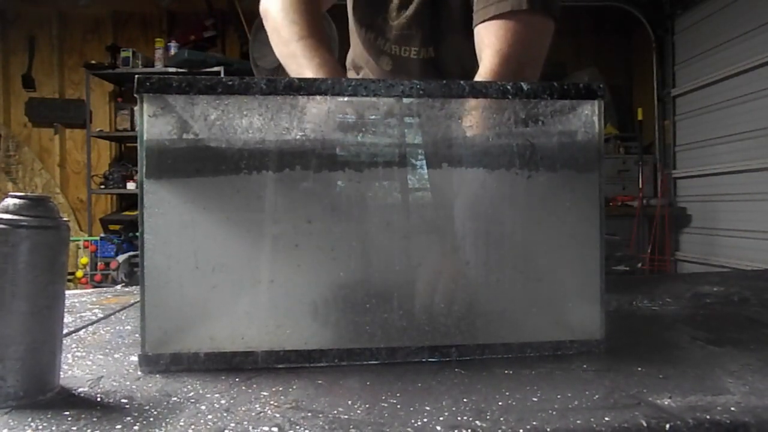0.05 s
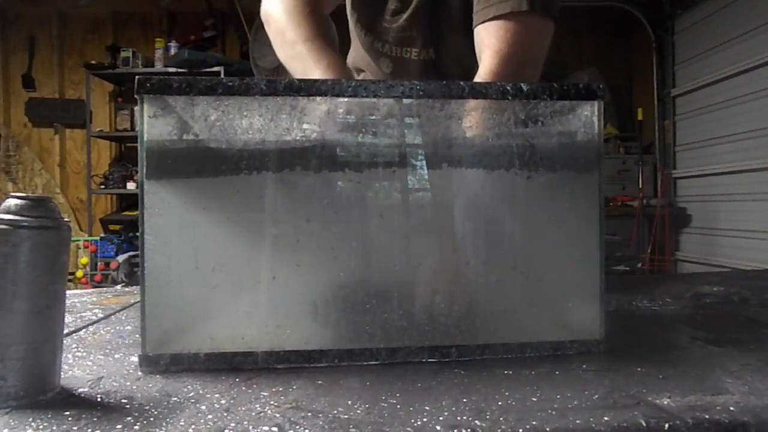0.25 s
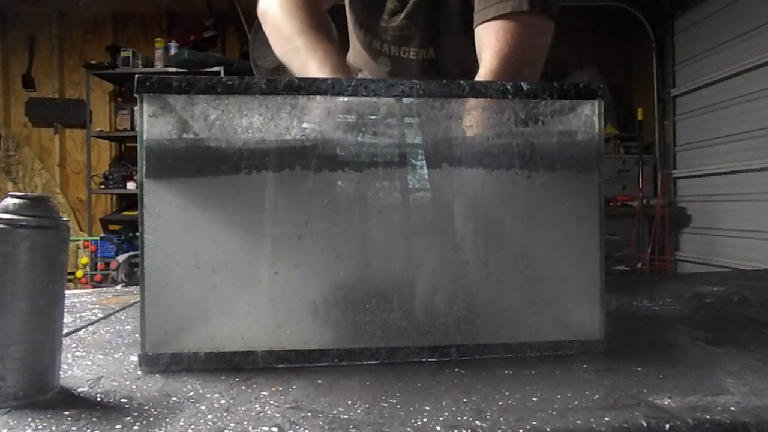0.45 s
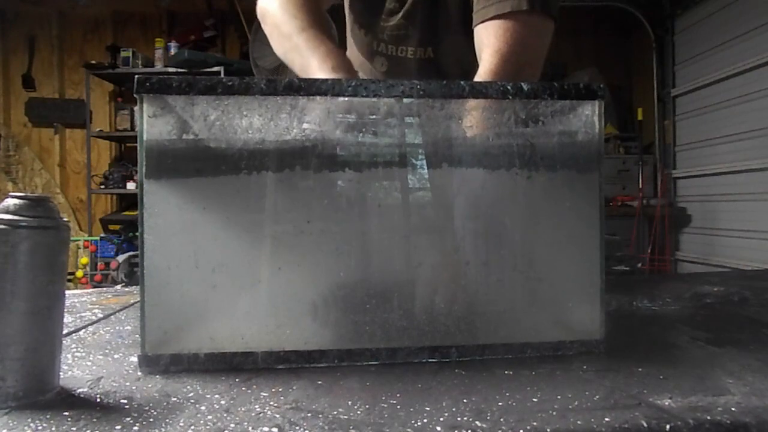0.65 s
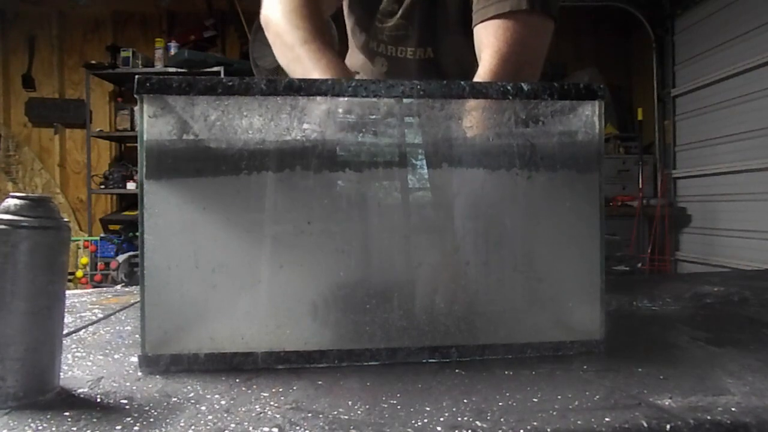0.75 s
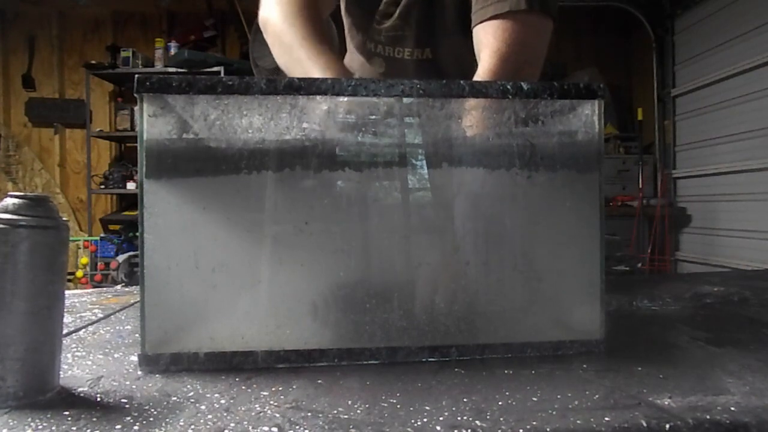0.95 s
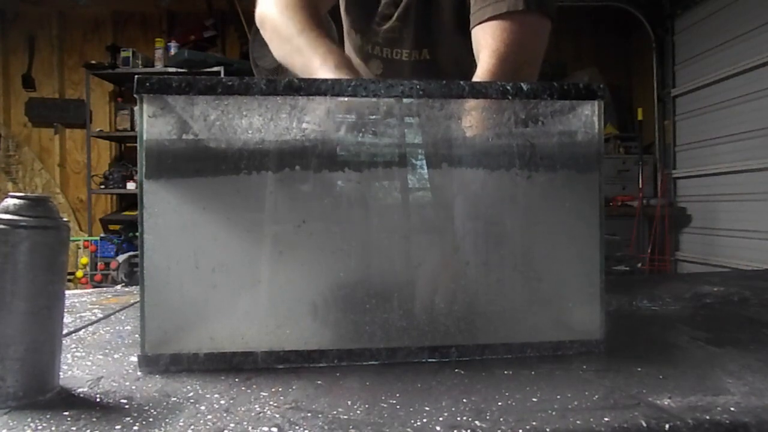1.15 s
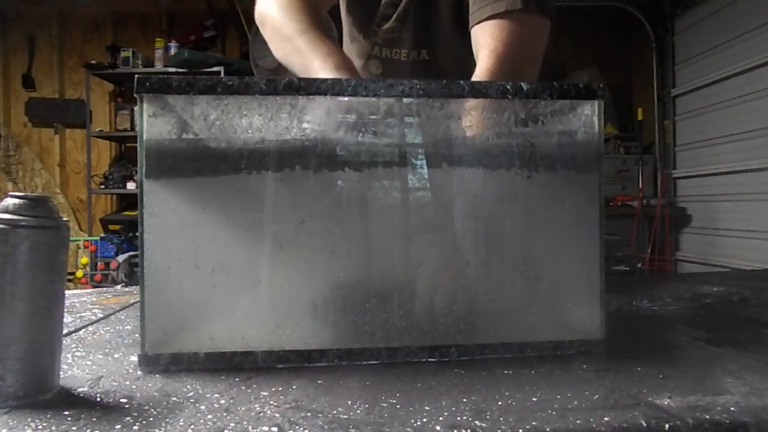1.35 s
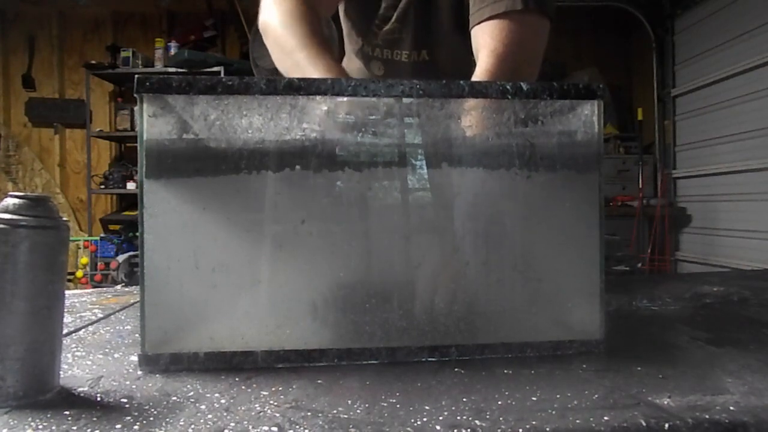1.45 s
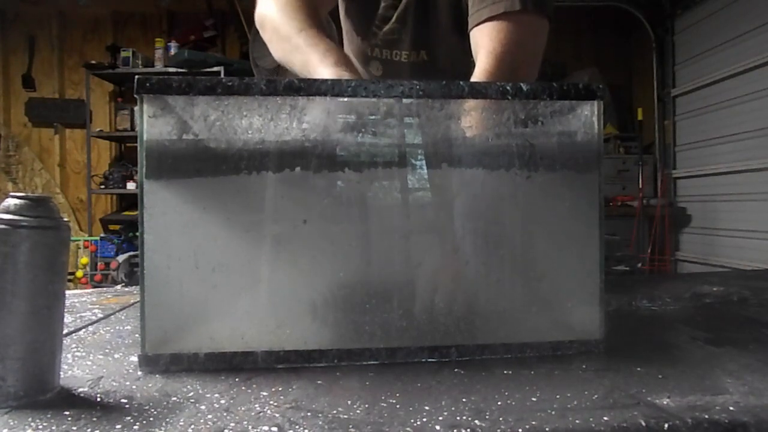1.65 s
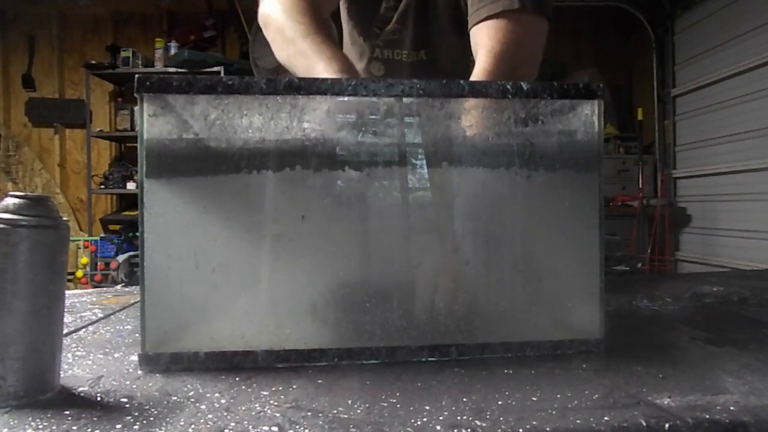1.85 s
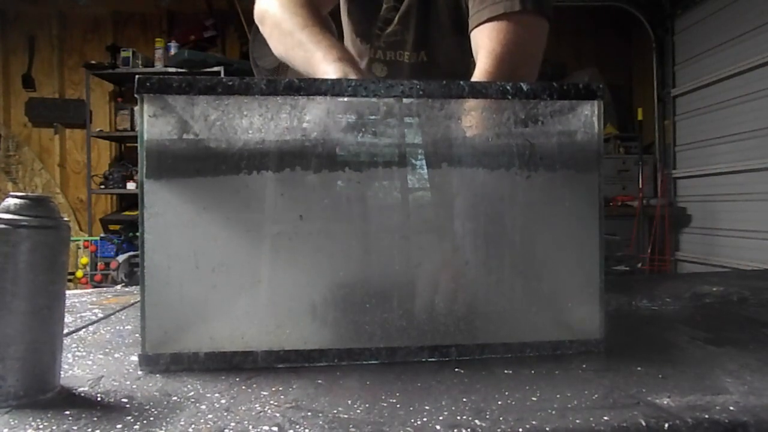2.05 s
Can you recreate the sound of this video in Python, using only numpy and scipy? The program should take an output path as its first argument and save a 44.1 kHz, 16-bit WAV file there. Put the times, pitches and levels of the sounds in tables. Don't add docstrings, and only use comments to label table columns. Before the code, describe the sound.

A screwdriver strikes a metal can held under water in a glass tank, about four knocks a second, each with a click, short damped ring and hollow thump; small splashes, close microphone in a garage.

```python
import sys
import numpy as np
from scipy import signal
from scipy.fft import rfft, irfft
from scipy.io import wavfile
from scipy.ndimage import uniform_filter1d

SR = 44100
rng = np.random.default_rng(int(sys.argv[2]) if len(sys.argv) > 2 else 0)


def inscribe(sig):
    pcm = np.round(np.clip(np.atleast_2d(sig).T, -1, 1) * 32767)
    wavfile.write(sys.argv[1], SR, pcm.astype(np.int16))


def invert_db(level):
    return 10 ** (np.asarray(level, dtype=float) / 20)


N = 92610


def unit(x):
    return x / np.sqrt(np.mean(x ** 2) + 1e-20)


def along(points, hz):
    point_hz, value = np.transpose(points)
    return np.interp(np.log(hz + 1), np.log(point_hz + 1), value)


def noise(spectrum, size, patchy_db=0.):
    hz, _, z = signal.stft(rng.standard_normal(size + 1024), SR, nperseg=1024)
    patches = uniform_filter1d(rng.standard_normal(z.shape), 10, 0)
    patches = uniform_filter1d(patches, 4, 1)
    gain_db = along(spectrum, hz)[:, None] + patchy_db * unit(patches)
    return unit(signal.istft(z * invert_db(gain_db), nperseg=1024)[1][:size])


def ring(modes, t):
    default_rise_s, scatter_db, detune = 0.0024, 0.5, 0.005
    wander_rad, wander_per_s = 0.88, 28.3
    m = np.array(modes)
    hz, db, t60 = m[:, :1], m[:, 1:2], m[:, 2:3]
    rise = np.abs(m[:, 3:4]) + 1e-4 if m.shape[1] > 3 else default_rise_s
    level_chance, pitch_chance = rng.standard_normal((2, len(m), 1))
    level_db = db + scatter_db * level_chance * np.minimum(hz / 600, 1)
    struck_hz = hz * (1 + detune * pitch_chance)
    walks = np.cumsum(rng.standard_normal((len(m), 40)), axis=1)
    wander = np.array([np.interp(t * wander_per_s, np.arange(len(k)), k - k[0]) for k in walks])
    envelope = invert_db(level_db - 60 * t / t60) * (1 - np.exp(-(t / rise) ** 2))
    return -np.sum(envelope * np.sin(2 * np.pi * struck_hz * t + wander_rad * wander), axis=0)


def place(out, start_s, sound):
    out[round(start_s * SR):][:len(sound)] += sound


# start in seconds, then bench, tank, can wall and can rim levels in dB.
JAB_HITS = [(0.208, -31.5, -30, -36, -30), (.4750, -38, -34.5, -35, -30.5), (0.714, -37, -32, -30, -33),
            (0.9525, -35, -29, -27.5, -27.5), (1.1958, -35.5, -28, -30.5, -30),
            (1.446, -35, -27.5, -30.5, -35.5), (1.7096, -36, -28.5, -28, -28.5)]
# deep thump level in dB, hollow note level in dB.
JAB_LANDINGS = [(-30.5, -30.5), (-32.5, -33), (-29.5, -31.5), (-28.5, -30.5), (-28, -27.5), (-27.5, -29.5),
                (-28, -29)]
# pitch in Hz, level in dB, t60 in seconds, rise in seconds.
BENCH_MODES = [(225.8, -9.5, 0.47, 0.0092), (235.8, -6, 0.46, 0.02), (266.4, -1.5, 0.093, 0.006)]
# pitch in Hz, level in dB, t60 in seconds, rise in seconds.
TANK_MODES = [(308.3, -4.5, 0.21, 0.0062), (319.4, -4, 0.13, 0.0056), (401, -16.5, 0.24, 0.006),
              (440.6, -17, 0.24, 0.0067), (602.3, -19, 0.18, 0.0023)]
# pitch in Hz, level in dB, t60 in seconds, rise in seconds.
CAN_WALL_MODES = [(762, -7, 0.048, 0.0054), (862, 0, 0.041, 0.0043), (911.8, 9.5, 0.032, 0.0098),
                  (953, -0.5, 0.037, 0.0084), (1062, 2, 0.036, 0.0058), (1149, -11.5, 0.068, 0.0084)]
# pitch in Hz, level in dB, t60 in seconds, rise in seconds.
CAN_RIM_MODES = [(1609, -12, 0.11, 0.0036), (1659, -7.5, 0.073, 0.0025), (1702, -10, 0.082, 0.0049),
                 (2083, -14, 0.02, 0.0017), (2916, -23.5, 0.038, 0.0042)]
# pitch in Hz, level in dB, t60 in seconds, rise in seconds.
TANK_FLOOR_MODES = [(65.7, -21.5, 0.51, 0.0099), (95.5, -21, 0.94, 0.058), (144.3, -2.5, 0.32, 0.011),
                    (153, -7, 0.12, 0.0063), (168.7, -8, 0.39, 0.023)]
# pitch in Hz, level in dB, t60 in seconds, rise in seconds.
HOLLOW_MODES = [(472, -11, 0.11, 0.0077), (505.4, -7, 0.096, 0.0041), (526.8, -6, 0.088, 0.0042)]


def jabs():
    bodies = (BENCH_MODES, TANK_MODES, CAN_WALL_MODES, CAN_RIM_MODES, TANK_FLOOR_MODES, HOLLOW_MODES)
    out, t = np.zeros(N + SR), np.arange(SR // 2) / SR
    for (start_s, *hit_db), landing_db in zip(JAB_HITS, JAB_LANDINGS):
        levels_db = [*hit_db, *landing_db]
        thump = sum(invert_db(db) * ring(body, t) for db, body in zip(levels_db, bodies))
        place(out, start_s, garage(thump))
    return out[:N]


# start in seconds, then crack, shell ring, splash and spray levels in dB.
TIP_CONTACTS = [(0.0836, -43.5, -68, -55.5, -62), (0.2093, -40.5, -65, -50.5, -68),
                (0.4737, -40, -80, -51, -72), (0.715, -37.5, -85, -51.5, -64), (0.774, -54, -74, -82, -85),
                (0.9344, -48, -63, -62, -74), (0.9475, -37, -45, -57, -78), (0.9516, -39, -66, -48.5, -52),
                (0.9907, -40.5, -52, -54, -87), (1.198, -37.5, -51, -49, -57), (1.4435, -41, -58, -55, -70),
                (1.4461, -33.5, -46.5, -44.5, -59), (1.4863, -43.5, -58, -60, -67),
                (1.704, -44, -57, -68, -51.5), (1.7092, -34, -44, -45.5, -68), (1.723, -37, -54, -60, -70),
                (1.7463, -40, -40.5, -56, -78), (1.824, -61, -82, -75, -59)]
# pitch in Hz, level in dB, t60 in seconds.
SHELL_MODES = [(1665, -5, 0.11), (1737, -5.5, .12), (1782, -4.5, 0.16), (1858, -4.5, 0.15),
               (1950, -7, 0.12), (2030, -2.5, 0.04), (2350, -14, 0.034), (2890, -15, 0.061),
               (4840, -14, 0.057)]


def contacts():
    out, t = np.zeros(N + SR), np.arange(SR // 2) / SR
    for start_s, crack_db, shell_db, splash_db, spray_db in TIP_CONTACTS:
        shell = invert_db(shell_db) * ring(SHELL_MODES, t)
        crack = invert_db(crack_db) * click(t)
        place(out, start_s, garage(shell + crack + splash(t, splash_db, spray_db)))
    return out[:N]


# frequency in Hz, level in dB per Hz.
CRACK_COLOUR = [(300, 9.5), (1500, 8.5), (4000, 0), (8000, -7), (15500, -17)]


def click(t):
    t60_s, rise_s = 0.014, 0.001
    envelope = invert_db(-60 * t / t60_s) * (1 - np.exp(-t / rise_s))
    z = rfft(envelope * noise(CRACK_COLOUR, len(t)))
    broad = np.sqrt(uniform_filter1d(np.abs(z) ** 2, size=250))
    colour = invert_db(along(CRACK_COLOUR, np.fft.rfftfreq(len(t), 1 / SR)))
    burst = irfft(z / broad * colour, len(t))
    burst = burst * (t < t[-1] / 2)
    return burst / np.abs(burst).max()


# frequency in Hz, level in dB per Hz.
SPLASH_COLOUR = [(300, 5), (1000, 1), (2500, -2.5), (5000, -8), (10000, -18), (15500, -40)]
# frequency in Hz, level in dB per Hz.
SPRAY_COLOUR = [(9000, -15), (12500, -7.5), (14500, -2), (15800, -4.5)]


def splash(t, splash_db, spray_db):
    wash_t60_s, spray_t60_s, rise_s = 0.32, 0.18, 0.0053
    wash = invert_db(splash_db - 60 * t / wash_t60_s) * noise(SPLASH_COLOUR, len(t), patchy_db=3)
    spray = invert_db(spray_db - 60 * t / spray_t60_s) * noise(SPRAY_COLOUR, len(t), patchy_db=3)
    return (wash + spray) * (1 - np.exp(-t / rise_s))


# start in seconds, pitch in Hz, level in dB, t60 in seconds.
PING_NOTES = [(0.075, 2100, -52.5, 0.026), (.0850, 900, -52, 0.043), (.2020, 2030, -45, 0.017),
              (.2100, 3900, -39.5, 0.014), (.2102, 4960, -60, 0.015), (.2105, 1050, -43.5, 0.035),
              (.2110, 523, -42.5, 0.097), (.2120, 864, -40.5, .06), (.4745, 3940, -41.5, .018),
              (.4765, 865, -33, 0.035), (.4780, 1050, -43, 0.037), (.5500, 1650, -57, 0.17),
              (.7150, 3020, -48, 0.029), (.7152, 5240, -53, 0.019), (.7172, 989, -29.5, .03),
              (0.65, 8000, -63, .012), (.9350, 2970, -49, .015), (.9478, 1950, -45, .02),
              (.9508, 3914, -35.5, 0.015), (.9912, 2915, -41, 0.023), (.9915, 3580, -47.5, 0.018),
              (.9920, 2050, -43, .02), (1.0150, 2350, -46, 0.023), (1.0200, 3260, -50, .015),
              (1.0466, 2200, -50, .015), (1.1970, 3930, -39, 0.013), (1.1972, 3500, -42.5, 0.016),
              (1.1980, 1110, -38, 0.043), (1.1985, 2120, -43, 0.013), (1.2900, 318, -48, 0.13),
              (1.3760, 519, -48.5, 0.09), (1.3970, 583, -50, .08), (1.4465, 3590, -37, 0.026),
              (1.4480, 2180, -40, 0.023), (1.4490, 863, -36.5, 0.071), (1.4650, 1650, -39, 0.034),
              (1.4865, 2050, -40, 0.029), (1.4867, 2460, -41, 0.026), (1.4870, 2900, -44, .02),
              (1.5110, 2400, -49, 0.033), (1.7045, 3700, -54, .011), (1.7108, 3600, -44.5, 0.016),
              (1.7110, 10000, -52, 0.0094), (1.7232, 1950, -31.5, 0.022), (1.7235, 2930, -44, 0.018),
              (1.7420, 4840, -52, 0.055), (1.7463, 2150, -37.5, 0.015), (1.7465, 1740, -34.5, .03)]


def pings():
    rise_cycles = 2.4
    out, t = np.zeros(N + SR), np.arange(SR // 2) / SR
    for start_s, hz, db, t60 in PING_NOTES:
        envelope = invert_db(db - 60 * t / t60) * (1 - np.exp(-(t * hz / rise_cycles) ** 2))
        place(out, start_s, envelope * np.sin(2 * np.pi * hz * t))
    return garage(out[:N])


def swell(strokes):
    t = np.arange(N) / SR
    return sum(invert_db(db) * np.interp(t, [start, peak, end], [0, 1, 0]) for start, peak, end, db in strokes)


# start, peak and end in seconds, level in dB.
HAND_STROKES = [(0.327, 0.44, 0.6, -60), (0.61, 0.698, 0.74, -58), (.83, 0.93, 0.98, -60.5),
                (1.748, 1.796, 1.9, -65)]
# frequency in Hz, level in dB per Hz.
WATER_COLOUR = [(600, -6), (2300, 6), (3500, -1), (4800, 0.5), (6600, -9), (7500, 0), (8500, -9),
                (15500, -10)]


def swish():
    return swell(HAND_STROKES) * noise(WATER_COLOUR, N, patchy_db=0.8)


# start, peak and end in seconds, level in dB.
SHAFT_SLIDES = [(.37, .43, 0.51, -65), (.64, .68, 0.69, -68), (.85, .89, 0.9, -67),
                (1.79, 1.83, 1.89, -63.5)]
# frequency in Hz, level in dB per Hz.
SCRAPE_COLOUR = [(3500, -32), (4700, 1), (6200, -7), (7500, -1), (9000, -9), (11000, -18), (12500, -5),
                 (15500, -13)]


def scrape():
    return swell(SHAFT_SLIDES) * noise(SCRAPE_COLOUR, N, patchy_db=4.0)


# frequency in Hz, t60 in seconds.
ROOM_T60 = [(150, 0.55), (1000, 0.39), (4000, 0.56), (12000, 0.3)]
# frequency in Hz, level in dB.
ROOM_COLOUR = [(150, -9), (250, -6), (500, 0.5), (1000, 4), (5000, -3)]


def garage(x):
    room_db, gap_s = -8, 0.006
    hz, t, z = signal.stft(rng.standard_normal(SR // 2), SR, nperseg=512)
    z = z * invert_db(-60 * t / along(ROOM_T60, hz)[:, None])
    energy = np.sum(signal.istft(z, nperseg=512)[1] ** 2)
    coloured = z * invert_db(room_db + along(ROOM_COLOUR, hz))[:, None]
    tail = signal.istft(coloured, nperseg=512)[1] / np.sqrt(energy)
    delayed = np.pad(x, (round(gap_s * SR), 0))
    return x + signal.fftconvolve(delayed, tail)[:len(x)]


# frequency in Hz, level in dB per Hz.
FLOOR_COLOUR = [(15, -41), (25, -24.5), (262, -7.5), (656, 0), (711, -1.5), (883, 2), (1320, -6),
                (1980, -8.5), (15900, -17.5)]


def fan_and_hiss():
    return invert_db(-61) * noise(FLOOR_COLOUR, N, patchy_db=0.5)


def scene():
    return (jabs() + contacts() + pings() + swish() + scrape())[None]


def low_pass(x):
    return signal.sosfilt(signal.butter(12, 16020, fs=SR, output="sos"), x)


def record(dry):
    low_cut_hz, top_hz = 220, 15830
    hz = np.fft.rfftfreq(N, 1 / SR)
    bass_cut = (1j * hz / (low_cut_hz + 1j * hz)) ** 2
    heard = rfft(dry) * bass_cut + rfft(fan_and_hiss())
    return low_pass(irfft(heard * (hz < top_hz), N))


dry = scene()
out = record(dry)
inscribe(out)
```